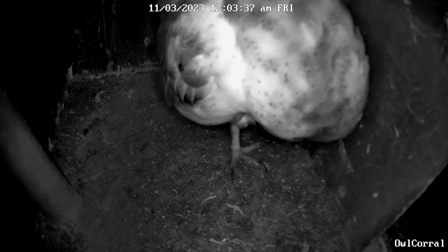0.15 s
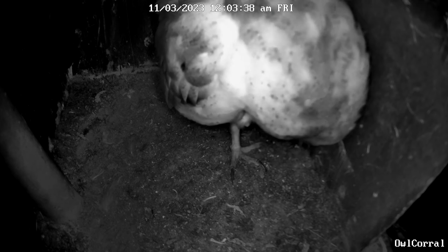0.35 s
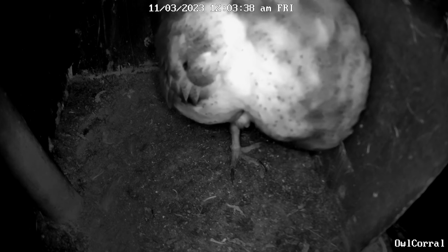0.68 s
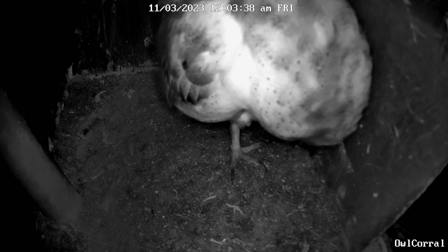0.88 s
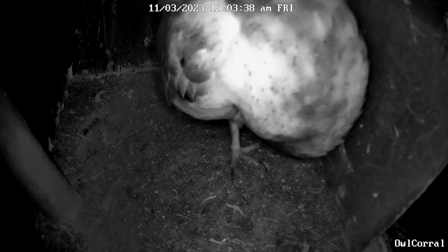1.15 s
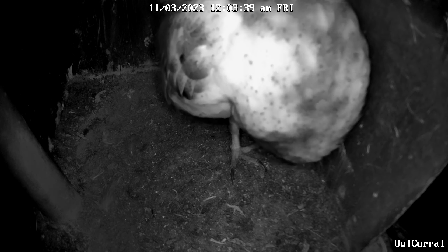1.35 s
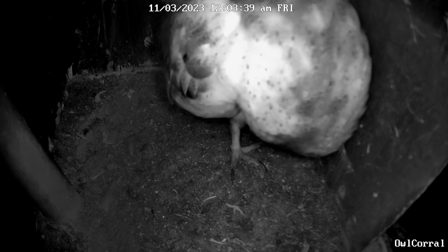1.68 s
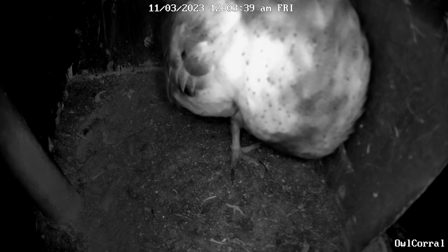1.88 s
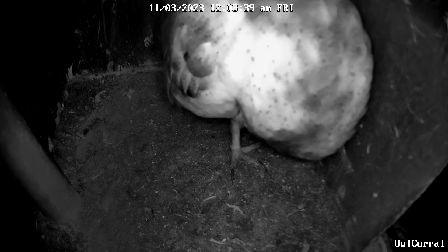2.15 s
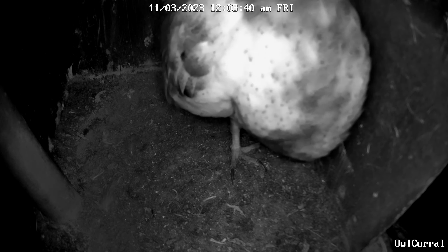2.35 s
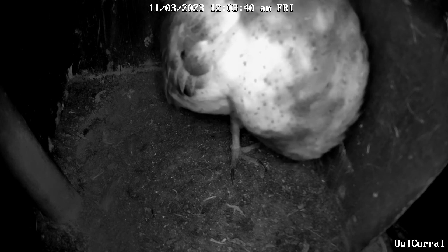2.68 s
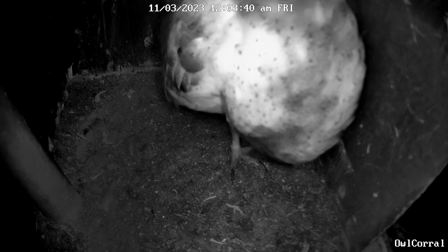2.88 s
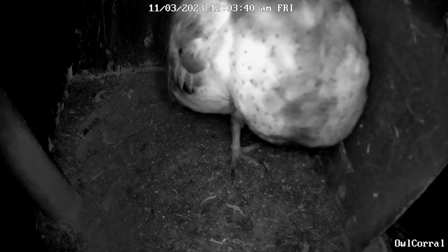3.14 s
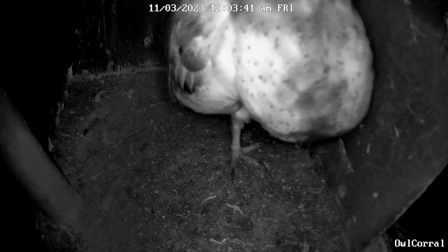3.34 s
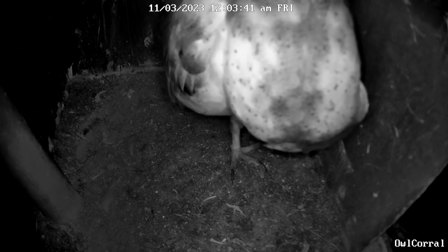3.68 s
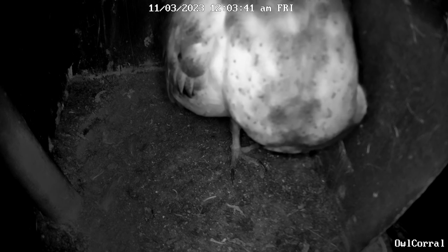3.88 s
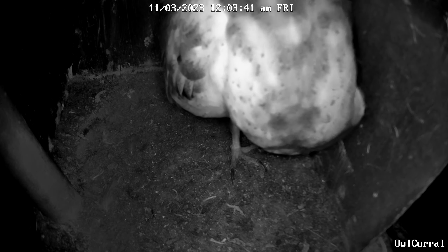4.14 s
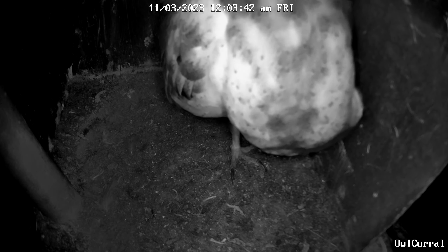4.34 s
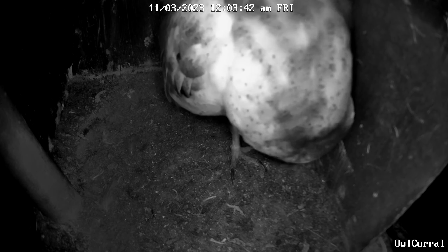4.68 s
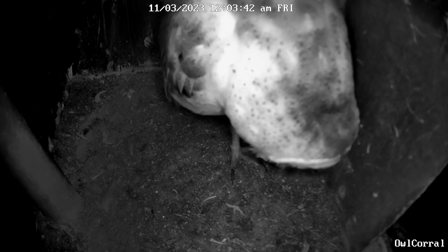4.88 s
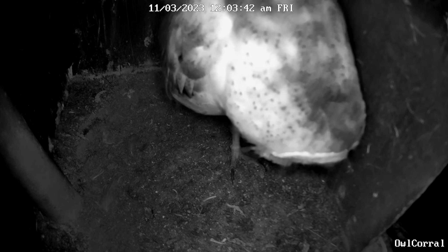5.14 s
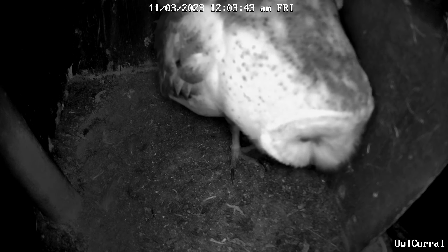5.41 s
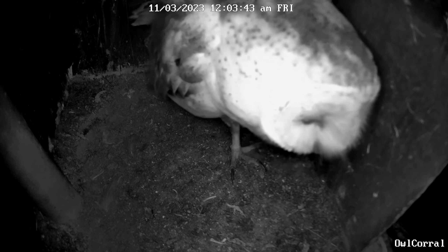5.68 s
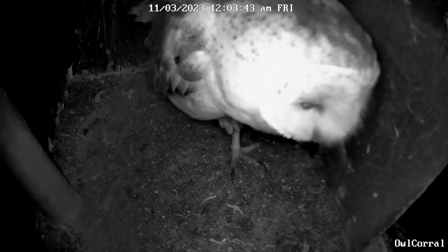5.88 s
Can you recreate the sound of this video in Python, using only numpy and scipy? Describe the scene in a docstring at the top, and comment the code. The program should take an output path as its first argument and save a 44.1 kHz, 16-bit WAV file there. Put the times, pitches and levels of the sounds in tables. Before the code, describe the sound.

A close camera microphone in a wooden nest box picks up low, slightly wavering distant motors, mains hum, soft hiss and faint thin ticking throughout. A barn owl taps lightly at 0.1 seconds, scrapes with a tiny squeak around 0.3, then makes a tight cluster of woody knocks, scratches and short squeaks at 0.45-0.6. Small rubs follow. A deep rumble swells, strongest near 1.1-1.3, with low thuds from 1.0 to 1.7, and subsides by about 2.4. Soft padded steps fall at 1.4, 1.8, 2.2 and 2.9. From 3.4 to 3.9 a second run of taps and scrapes includes a stronger knock near 3.5 and a faint squeak. Duller steps come at 4.4 and 4.6. Between 5.0 and 5.25 the bill nibbles through a feather in dry, crackly strokes, ending with a step and tap. Near 5.9, a soft step and quiet hollow board bumps close the scene.

```python
"""A barn owl shifts and preens in a wooden nest box at night, close to a small camera. Throughout, two distant
motors and a mains tone hum, hiss lies under them and the camera ticks faintly. Claws and bill first tap and
scrape while feather shafts squeak, shaking resonances of boards and air with pushes and tiny slips. Then
filtered-noise rumble swells with deep thuds, soft steps set in, and a second run of taps follows. Near the end
the bill nibbles through a feather in crackly strokes, and hollow bumps ring a wall board."""
import sys
import numpy as np
from scipy import signal
from scipy.fft import rfft, irfft, next_fast_len
from scipy.io import wavfile
from scipy.ndimage import uniform_filter1d

SR = 44100
rng = np.random.default_rng(int(sys.argv[2]) if len(sys.argv) > 2 else 0)


def log_audio(samples):
    """Write samples as a 16-bit WAV file to the path given in sys.argv[1]."""
    # one column per channel
    frames = np.atleast_2d(samples).T
    # limit to full scale, then quantise
    limited = np.clip(frames, -1, 1)
    pcm = np.round(limited * 32767).astype(np.int16)
    wavfile.write(sys.argv[1], SR, pcm)


N = 265967
TIME = np.arange(N) / SR  # s

# Boards and air of the box. Each row: resonance in Hz, width in Hz, relative level in dB.
BOX_MODES = [(111.7, 18, 19), (260, 22, -18.5), (288, 21, 1.5), (375, 270, -21), (470, 10, -12),
             (765, 160, -15.5), (707, 240, -8.5), (820, 24, -20), (1008, 46, -6.5), (1200, 180, -18),
             (1490, 65, -31), (623, 95, -18.5)]
# Higher resonances that colour scrapes and the tail of a tap.
# Each row: resonance in Hz, width in Hz, relative level in dB.
RASP_MODES = [(1510, 110, 5.5), (1702, 50, 6), (2000, 45, -5.5), (2190, 72, -0.5), (2440, 49, -9),
              (2720, 180, -4), (3300, 3100, -6), (5440, 5200, -2.5), (1900, 770, -10)]
FOOT_AND_BODY_RASP_HZ = 1900


def undb(db):
    """Decibels to gain."""
    return 10 ** (np.asarray(db) / 20)


def unit(x):
    """Scale to rms 1."""
    return x / np.sqrt(np.mean(x ** 2))


def shape(x, response):
    """Filter by a response given as a function of frequency."""
    size = next_fast_len(len(x) + 4096)  # padding leaves room for the ring
    f = np.maximum(np.fft.rfftfreq(size, 1 / SR), 1e-3)
    return irfft(rfft(x, size) * response(f), size)[:len(x)]


def band(f, hz, width):
    """One resonance, gain 1 at its centre."""
    return 1 / (1 + 1j * (f * f - hz * hz) / (f * width))


def modes(f, table):
    """Resonances that sound together; neighbours in the table move in opposite directions."""
    return sum((-1) ** k * undb(db) * band(f, hz, width) for k, (hz, width, db) in enumerate(table))


def contact(f, hz):
    """A soft contact pushes slowly and leaves out the treble."""
    return 1 / (1 + 1j * np.sqrt(2) * f / hz - (f / hz) ** 2) ** 2


def impulse():
    """A single-sample push in a quarter second of silence."""
    return 1. * (TIME[:SR // 4] == 0)


def decay(t, t60):
    """Exponential fall of 60 dB in t60 seconds."""
    return np.exp(-np.log(1000) * t / t60)


def swell(t, half):
    """Bell-shaped rise and fall around time zero."""
    return np.exp(-.5 * (t / half) ** 2)


def at_peak(db, sound):
    """Scale a sound to a peak level in dB."""
    return undb(db) * sound / abs(sound).max()


def walk(rate):
    """Smooth random wander around zero, spread near 1, with rate new values per second."""
    k = int(SR / rate)
    return uniform_filter1d(np.repeat(rng.standard_normal(N // k + 1), k), k)[:N]


def add(out, s, sound):
    """Mix a sound in from time s."""
    start = int(round(s * SR))
    first, last = max(start, 0), min(start + len(sound), N)
    out[first:last] += sound[first - start:last - start]


def background(level_db=-65):
    """Night air in the box and the even hiss of the microphone, as noise with a fixed spectrum."""
    # Each row: frequency in Hz, relative level in dB per Hz.
    floor = [(8, -20), (30, -26), (42, -26.5), (70, -20.5), (130, -21), (160, -29.5), (200, -36.5),
             (250, -34.5), (305, -32), (355, -40), (600, -41.5), (1200, -45.5), (3000, -49.5), (7400, -54),
             (8000, -56.5)]
    hz, db = np.transpose(floor)
    hiss = shape(rng.standard_normal(N), lambda f: undb(np.interp(np.log(f), np.log(hz), db)))
    return undb(level_db) * unit(hiss)


def mains_hum(hz=60, level_db=-70.5):
    """Electric mains give one steady sine."""
    return undb(level_db) * np.sqrt(2) * np.sin(2 * np.pi * hz * TIME)


def motor(hz, harmonics, drift=0.0024):
    """Harmonics of a shaft whose speed wanders by a small share, drift."""
    turns = np.cumsum(hz * (1 + drift * walk(1.493))) / SR
    return sum(np.sqrt(2) * undb(db) * np.sin(2 * np.pi * (k * turns + rng.random())) for k, db in harmonics)


def motors(slow_hz=22.37, fast_hz=24.49):
    """Two distant shafts turn at slightly different rates and hum through the walls."""
    # Each row: multiple of the shaft rate, level in dB.
    slow_harmonics = [(1, -55.5), (2, -63.5), (3, -65.5), (4, -71), (5, -69.5)]
    fast_harmonics = [(1, -62.5), (2, -62), (3, -62.5), (4, -73), (5, -63)]
    return motor(slow_hz, slow_harmonics) + motor(fast_hz, fast_harmonics)


def camera_ticks(level_db=-66.5, centre_hz=6300, width_hz=2700, burst_hz=7.5, count_start_s=.4543):
    """Bursts of current leak into the microphone as a thin ticking, its count restarted every second."""
    # Packets of switching noise in one burst. Each row: delay in s, half length in s, relative level in dB.
    packets = [(-.0064, .0009, -5), (-.001, .0005, 0), (.0007, .0004, 0), (.003, .0006, -4),
               (.0046, .0005, -8), (.0068, .0008, -6)]
    gate, t = np.zeros(N), TIME[:SR // 40] - 1 / 80
    burst = sum(undb(db) * swell(t - delay, half) for delay, half, db in packets)
    count_starts = count_start_s + np.arange(-1, N / SR)[:, None]
    starts = count_starts + np.arange(0, 1, 1 / burst_hz)
    for s in starts[(starts > 0) & (starts < N / SR)]:
        jitter = .0003 * rng.standard_normal()  # s
        add(gate, s + t[0] + jitter, burst)
    noise = shape(rng.standard_normal(N),
                  lambda f: band(f, centre_hz, width_hz) * band(f, centre_hz, centre_hz))
    # keeping only the phase makes the whine even in strength but unsteady in pitch
    whine = np.cos(np.angle(signal.hilbert(noise)))
    return undb(level_db) * gate * unit(whine)


def rumble():
    """Outside rumble booms in two low noise bands and swells like something passing far away."""
    # Each row: band centre in Hz, width in Hz of its narrow filter.
    booms = [(84.85, 11), (114.7, 12)]
    # Each row: time in s, lower band level in dB, upper band level in dB.
    rumble_levels = [(0, -56, -62), (.45, -54, -56.5), (.75, -55.5, -65), (1.0, -51.5, -53.5),
                     (1.18, -48.5, -57.5), (1.33, -51.5, -65), (1.65, -51.5, -57.5), (1.95, -58.5, -61),
                     (2.4, -71, -59.5), (4.9, -65, -62), (6.03, -63.5, -54.5)]
    times, *levels = np.transpose(rumble_levels)
    out = 0
    for (hz, width), db in zip(booms, levels):
        boom = shape(rng.standard_normal(N), lambda f: band(f, hz, width) * band(f, hz, hz / 2) ** 2)
        out = out + unit(boom) * undb(np.interp(TIME, times, db))
    return out


def thuds(width_hz=59):
    """Short, deep pushes with no treble stand out of the rumble."""
    # Each row: start in s, peak level in dB, centre in Hz.
    thud_rows = [(0.973, -43, 99.7), (1.050, -45, 96), (1.148, -37.5, 94.6), (1.224, -44.5, 104),
                 (1.255, -42.5, 95), (1.616, -44.5, 84), (1.653, -43, 98.4)]
    out = np.zeros(N)
    for s, db, hz in thud_rows:
        boom = shape(impulse(), lambda f: band(f, hz, width_hz) ** 4)
        add(out, s, at_peak(db, boom))
    return out


def knock(db, contact_hz):
    """One push rings the boards and the air of the box."""
    return at_peak(db, shape(impulse(), lambda f: modes(f, BOX_MODES) * contact(f, contact_hz)))


def stroke(s, half, wood_db, wood_hz, rasp_db, rasp_hz, slip_rate=1300, scatter_db=4.0,
           wood_width=0.7, rasp_width=1.0, surface=RASP_MODES):
    """A swell of tiny slips, slip_rate per second, shakes the wood and rasps in the upper resonances."""
    out, t = np.zeros(N), TIME[:SR // 2] - 1 / 4
    chance, size, push = rng.random(len(t)), rng.exponential(size=len(t)), rng.standard_normal(len(t))
    strength = np.sign(push) * undb(scatter_db * np.minimum(size, 3))
    slips = (chance < slip_rate / SR) * strength * swell(t, half)
    # speed and place of the contact decide which resonances answer; widths are shares of the centre
    wood = shape(slips, lambda f: modes(f, BOX_MODES) * band(f, wood_hz, wood_width * wood_hz) ** 2)
    rasp = shape(slips, lambda f: modes(f, surface) * band(f, rasp_hz, rasp_width * rasp_hz) ** 2)
    duty = np.sqrt(np.sqrt(np.pi) * half * SR / len(t))  # levels hold at the top of the swell
    add(out, s + t[0], duty * (undb(wood_db) * unit(wood) + undb(rasp_db) * unit(rasp)))
    return out


def fidgets(count=10, spread_db=2, half_s=0.022, wood_db=-78, wood_hz=260, rasp_db=-85):
    """Dull, faint rubs of the body at random moments, scattered through the whole scene."""
    out = np.zeros(N)
    for k in range(count):
        s = (k + rng.random()) / count * N / SR
        db = spread_db * rng.standard_normal()
        out += stroke(s, half_s, wood_db + db, wood_hz, rasp_db + db, FOOT_AND_BODY_RASP_HZ)
    return out


def bumps(width_hz=92):
    """A push cushioned by feathers rings one wall board with a hollow bump as the owl turns."""
    # Each row: start in s, peak level in dB, ring in Hz.
    bump_rows = [(5.840, -64.5, 487), (5.918, -64, 470), (5.938, -58, 470), (5.961, -57, 446)]
    out = np.zeros(N)
    for s, db, hz in bump_rows:
        ring = shape(impulse(), lambda f: band(f, hz, width_hz) ** 2)
        add(out, s, at_peak(db, ring))
    return out


def steps(contact_hz=290):
    """A padded foot thuds on the boards, then its toes scuff in proportion to its weight."""
    # Each row: start in s, peak level in dB.
    step_rows = [(1.411, -45.5), (1.79, -49.5), (2.21, -46.5), (2.924, -47.5), (4.428, -50.5),
                 (4.588, -43.5), (5.236, -41.5), (5.881, -49)]
    scuff_delay_s, scuff_half_s, scuff_hz = 0.004, 0.014, 283
    scuff_wood_db, scuff_rasp_db = -19, -36  # re the step's peak
    out = np.zeros(N)
    for s, db in step_rows:
        add(out, s, knock(db, contact_hz))
        out += stroke(s + scuff_delay_s, scuff_half_s, db + scuff_wood_db, scuff_hz,
                      db + scuff_rasp_db, FOOT_AND_BODY_RASP_HZ)
    return out


def nibbles(rasp_hz=3070):
    """Short, bright, crackly strokes of the bill along a feather, over the smooth swish of its barbs."""
    # Each row: middle in s, half length in s, wood level in dB, wood centre in Hz, rasp level in dB.
    bite_rows = [ (4.973, 0.0062, -63, 490, -72), (5.015, 0.0081, -62.5, 288, -74.5),
                 (5.068, 0.0078, -70.5, 450, -70.5), (5.113, 0.0037, -85, 406, -73),
                 (5.137, 0.012, -73, 313, -75), (5.188, 0.014, -66, 320, -75.5),
                 (5.227, 0.0064, -84, 302, -71), ]
    # The feather slides through the bill under the nibbles; one row, columns as above.
    swish = (5.15, 0.13, -83, 900, -83)
    # Barbs answer broadly, without ringing. Each row: centre in Hz, width in Hz, relative level in dB.
    barbs = [(1750, 370, 0.5), (2960, 670, -2), (3580, 970, -2.5), (4570, 1800, -8)]
    bites = sum(stroke(*row, rasp_hz, slip_rate=1500, rasp_width=1.0, surface=barbs) for row in bite_rows)
    return bites + stroke(*swish, rasp_hz, slip_rate=6000, scatter_db=0.0, rasp_width=0.82, surface=barbs)


def squeaks(wobble_rate=200, wobble=0.018):
    """A feather shaft sticks and slips, singing briefly in one resonance: a short tone, unsteady in pitch."""
    # Each row: middle in s, half length in s, pitch in Hz, level in dB at the top of the swell.
    squeak_rows = [(0.292, 0.009, 1030, -71), (0.33, 0.008, 1028, -67.5), (0.489, 0.0075, 1516, -63.5),
                   (0.51, 0.0082, 1533, -71), (0.551, 0.0063, 765, -73), (0.563, 0.01, 2190, -70),
                   (3.637, 0.013, 1490, -76)]
    out = 0
    for s, half, hz, db in squeak_rows:
        turns = np.cumsum(hz * (1 + wobble * walk(wobble_rate))) / SR  # wobble is a share of the pitch
        out = out + np.sqrt(2) * undb(db) * swell(TIME - s, half) * np.sin(2 * np.pi * turns)
    return out


def scrapes():
    """Bill and claws drag over feathers and floor in strokes of tiny slips."""
    # Each row: middle in s, half length in s, wood level in dB, wood centre in Hz,
    # rasp level in dB, rasp centre in Hz.
    scrape_rows = [ (0.136, 0.0068, -68.5, 910, -69, 2200), (0.3, 0.009, -55.5, 283, -71, 2500),
                   (0.314, 0.047, -69.5, 730, -74.5, 2110), (0.323, 0.0047, -63, 304, -66, 1750),
                   (0.475, 0.015, -74.5, 704, -70.5, 2720), (0.499, 0.0055, -69, 600, -74, 2700),
                   (0.506, 0.0089, -59.5, 550, -70.5, 2480), (0.529, 0.0067, -56, 282, -80, 2200),
                   (0.536, 0.012, -62, 645, -62.5, 2000), (0.568, 0.011, -75, 484, -70, 1750),
                   (0.719, 0.019, -73, 560, -69.5, 1980), (0.766, 0.0099, -76, 760, -70, 1840),
                   (0.873, 0.082, -68.5, 312, -80.5, 2170), (1.373, 0.011, -76, 700, -72, 2100),
                   (1.467, 0.06, -73.5, 520, -80.5, 2060), (1.693, 0.063, -70.5, 260, -103, 2120),
                   (2.09, 0.02, -71.5, 415, -73, 2160), (2.918, 0.004, -78, 306, -72, 1810),
                   (3.156, 0.015, -70, 260, -77, 2500), (3.456, 0.0065, -71, 600, -90, 2000),
                   (3.493, 0.018, -66.5, 624, -76.5, 1600), (3.646, 0.026, -69, 306, -74, 2430),
                   (3.797, 0.0094, -63, 282, -69, 2650), (3.831, 0.0058, -60, 290, -73, 2200),
                   (3.846, 0.006, -71, 1000, -69.5, 1900), (3.862, 0.007, -53.5, 285, -71.5, 2780),
                   (3.924, 0.0077, -71.5, 407, -72.5, 2200), (5.935, 0.0055, -76, 795, -73, 1900),
                   (5.984, 0.004, -67.5, 342, -79, 1900), ]
    return sum(stroke(*row) for row in scrape_rows)


def taps(tail_db=-27, tail_t60=0.048, snap_db=1.0):
    """Claw or bill knocks the box and ticks: a clean snap, a brief crumbling and a ring between the walls."""
    # Each row: start in s, knock peak in dB, contact cut-off in Hz, tick peak in dB, tick centre in Hz,
    # width in Hz of each of the four tick filters, 60 dB decay time of the crumbling in s.
    tap_rows = [ (0.1281, -53, 1510, -49.5, 1850, 1900, 0.027),
                (0.127, -58.5, 1200, -55, 3480, 1500, 0.014), (0.4642, -54, 1420, -59, 2000, 2600, 0.0095),
                (0.504, -52, 900, -57, 2400, 1700, 0.02), (0.5287, -41.5, 750, -53, 1890, 1100, 0.03),
                (0.532, -41.5, 850, -57.5, 1990, 1310, 0.02), (0.5440, -52, 900, -49, 1920, 1350, 0.017),
                (3.372, -48, 1200, -53.5, 2600, 5230, 0.1), (3.3743, -60, 1190, -55, 1780, 1500, 0.02),
                (3.4748, -35, 700, -45.5, 945, 650, 0.016), (3.4773, -52, 500, -57, 3200, 4000, 0.03),
                (3.591, -77, 1000, -56, 1780, 1800, 0.02), (3.6000, -50.5, 910, -46.5, 2180, 1370, 0.013),
                (3.628, -58, 1000, -64, 1490, 2400, 0.014), (3.7903, -53, 1200, -54.5, 4920, 5500, 0.017),
                (3.7894, -62, 1110, -51, 2000, 2100, 0.018), (3.8096, -66, 1200, -62, 2200, 3000, 0.012),
                (5.2348, -69, 660, -54.5, 4770, 6000, 0.028), (5.233, -61, 660, -59, 1840, 1100, 0.025),
                (5.2341, -51.5, 497, -55.5, 1114, 330, 0.024), ]
    out, t = np.zeros(N), TIME[:SR // 4]
    for s, knock_db, contact_hz, tick_db, tick_hz, width_hz, t60 in tap_rows:
        crumble, air = rng.standard_normal((2, len(t)))
        crumble = crumble * decay(t, t60)
        snap = undb(snap_db) * np.linalg.norm(crumble) * impulse()  # energy set against the crumbling
        ring = unit(shape(air, lambda f: modes(f, RASP_MODES))) * decay(t, tail_t60)
        tick = shape(snap + crumble + undb(tail_db) * ring, lambda f: band(f, tick_hz, width_hz) ** 4)
        add(out, s, knock(knock_db, contact_hz) + at_peak(tick_db, tick))
    return out


def scene():
    """The owl over hum, rumble and camera noise, in one channel."""
    surroundings = background() + mains_hum() + motors() + camera_ticks() + rumble() + thuds()
    owl = fidgets() + bumps() + steps() + nibbles() + squeaks() + scrapes() + taps()
    return (surroundings + owl)[None]


def record(dry, top_hz=8000):
    """The camera keeps only the band below its cut-off; the sound fades in over 8 ms."""
    fade_in = np.minimum(TIME / .008, 1)
    return signal.sosfilt(signal.butter(24, top_hz, fs=SR, output="sos"), dry * fade_in)


dry = scene()
out = record(dry)
log_audio(out)
```